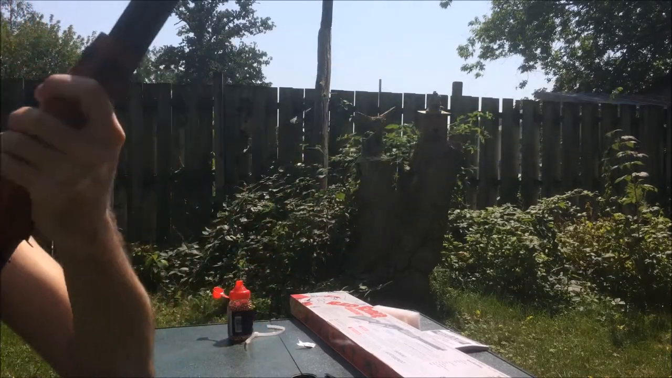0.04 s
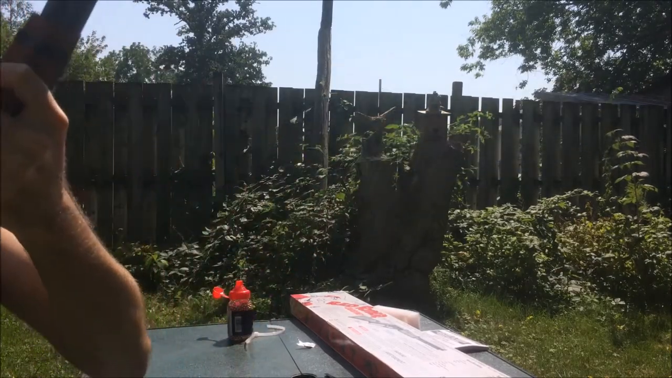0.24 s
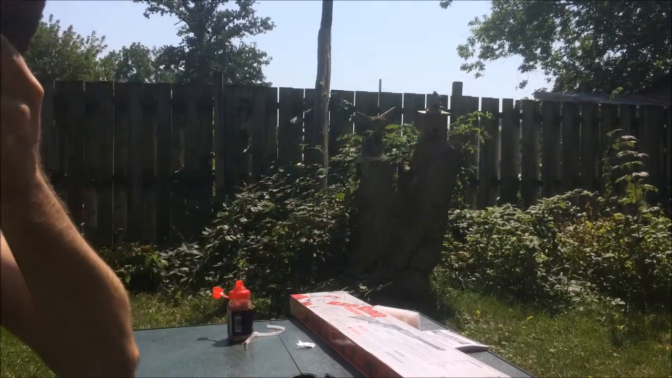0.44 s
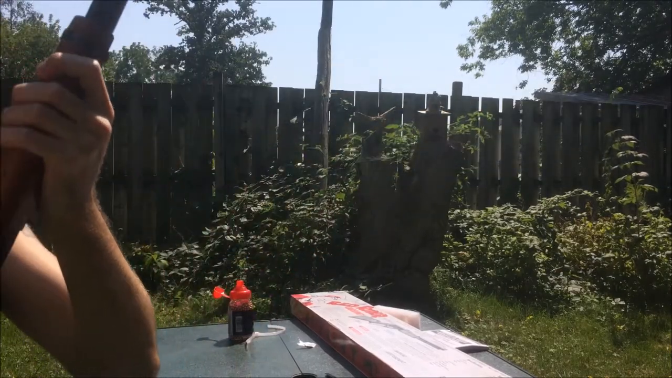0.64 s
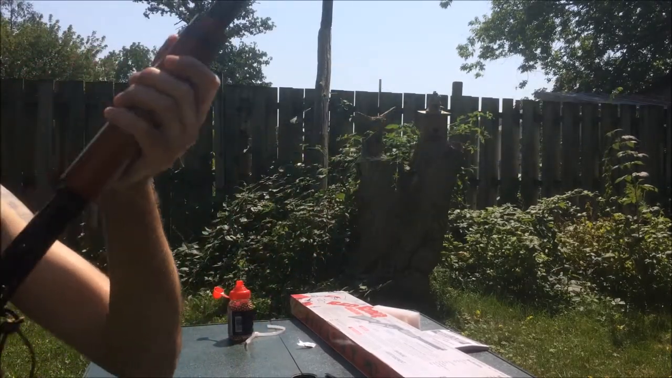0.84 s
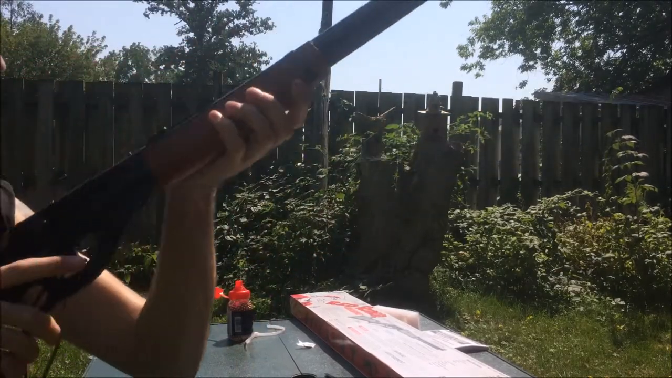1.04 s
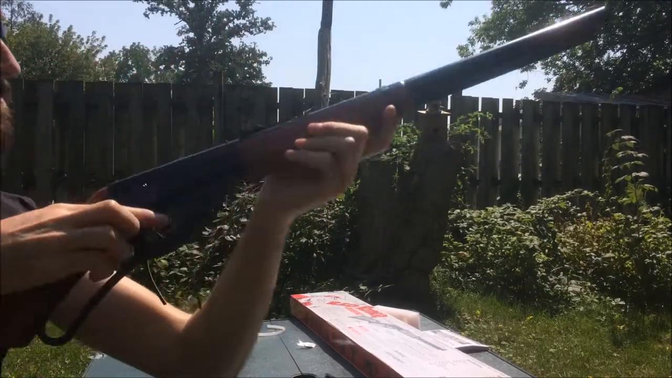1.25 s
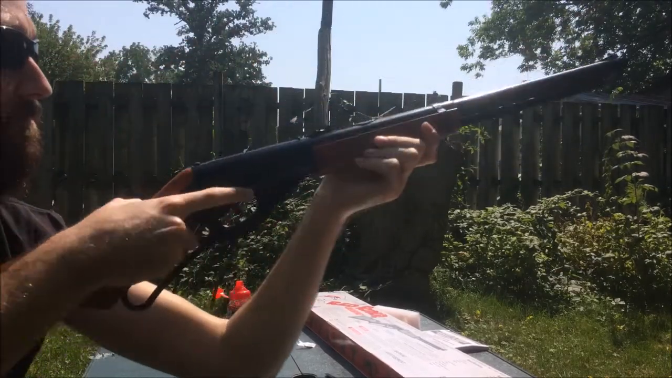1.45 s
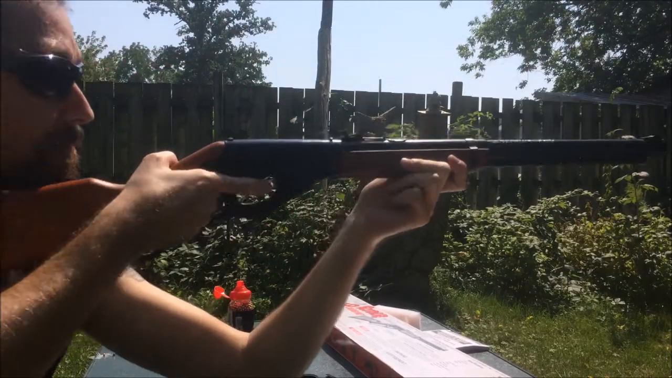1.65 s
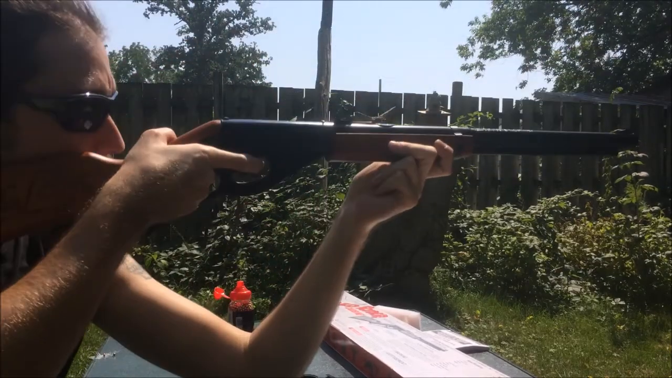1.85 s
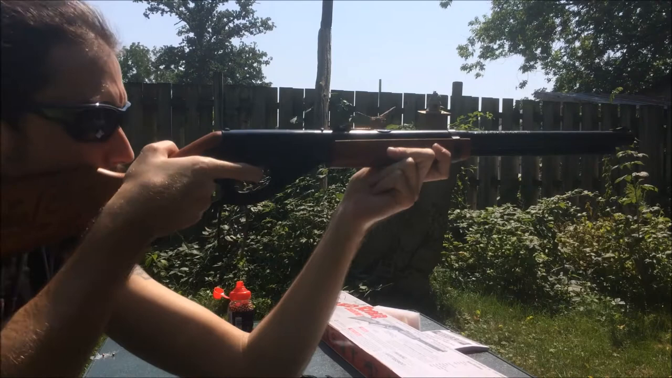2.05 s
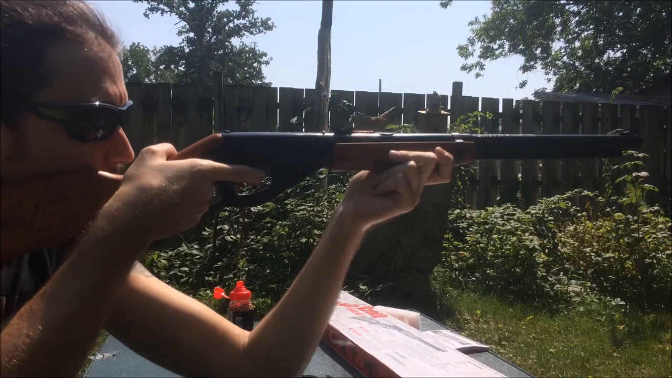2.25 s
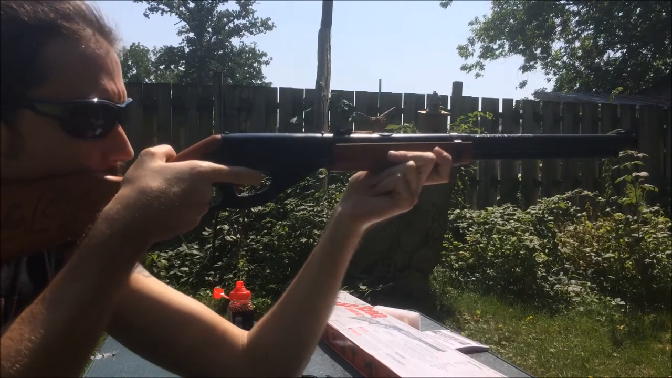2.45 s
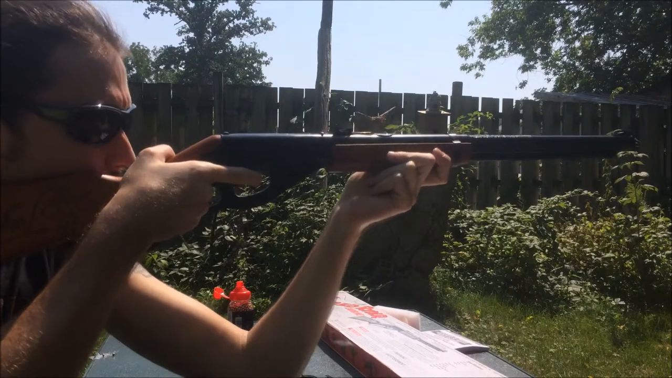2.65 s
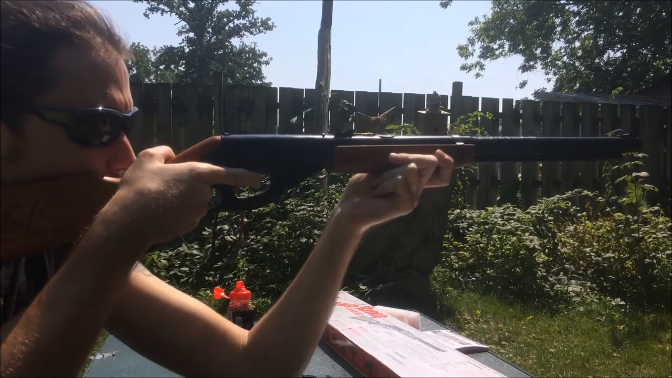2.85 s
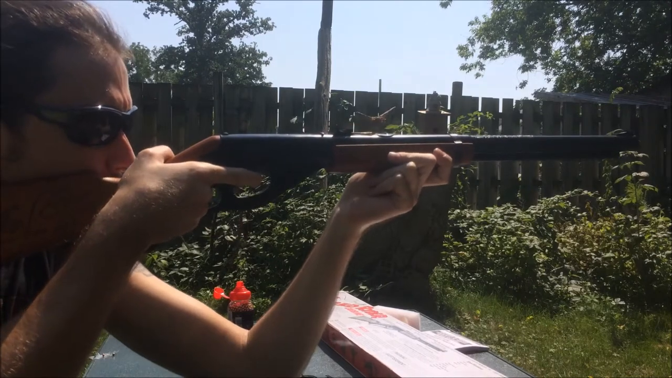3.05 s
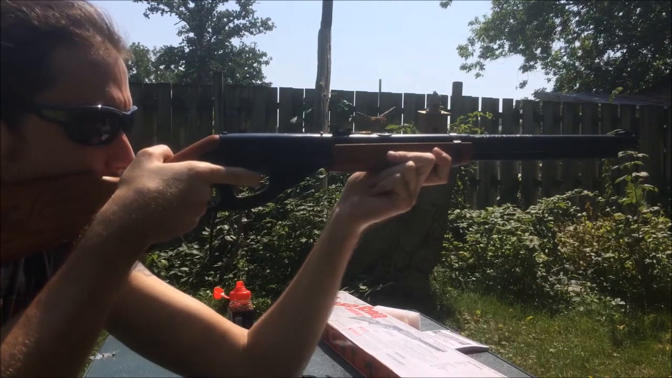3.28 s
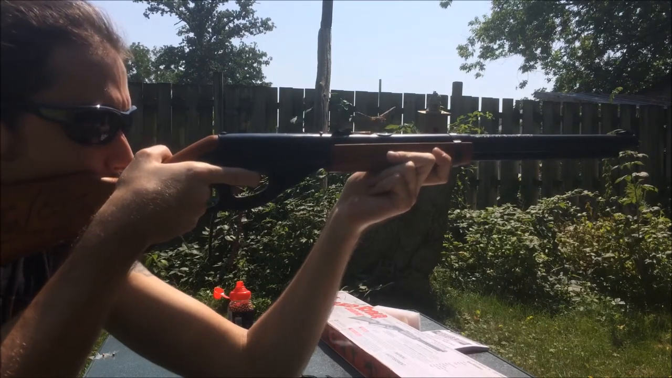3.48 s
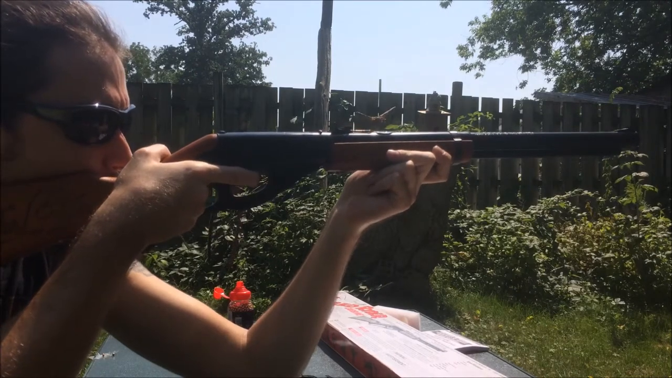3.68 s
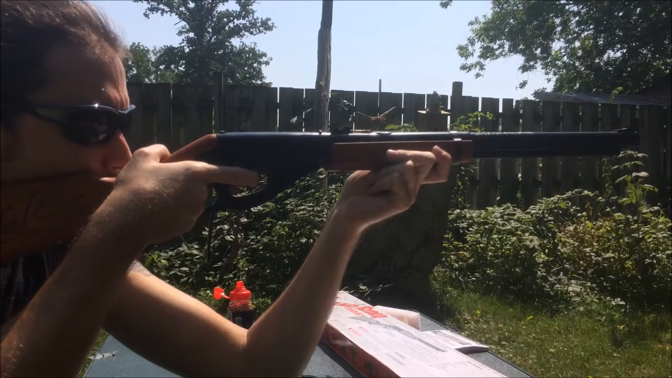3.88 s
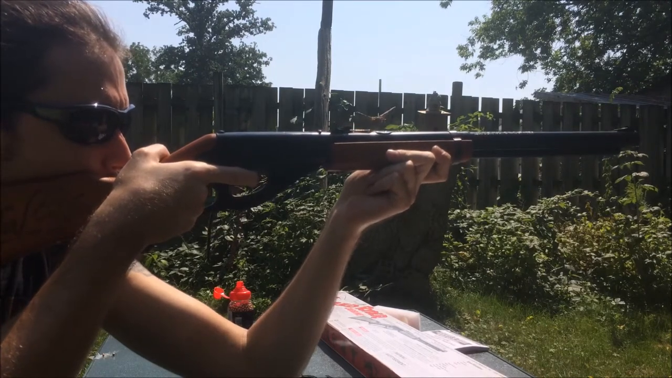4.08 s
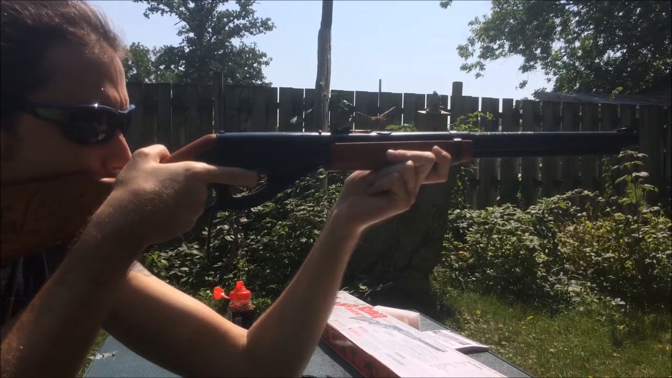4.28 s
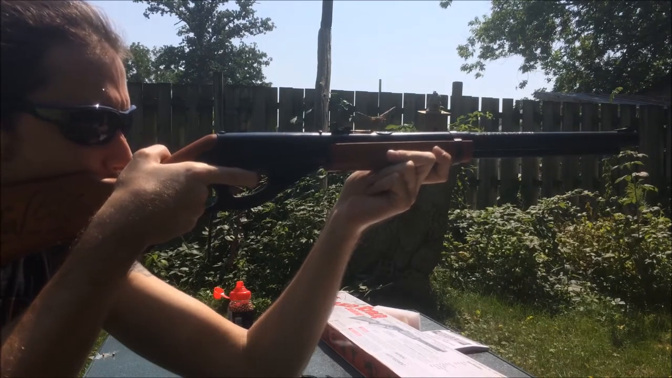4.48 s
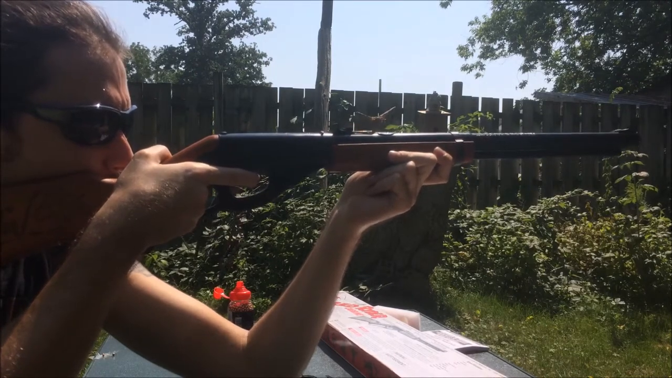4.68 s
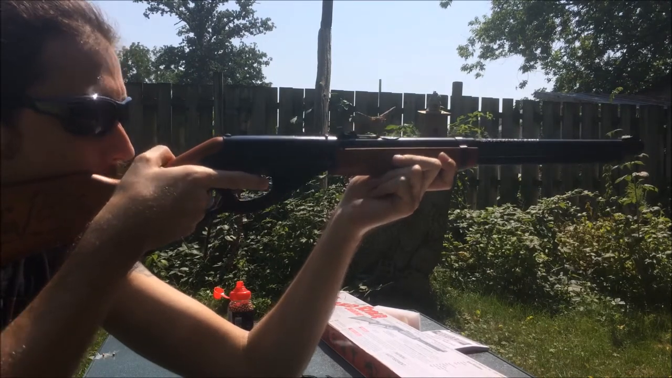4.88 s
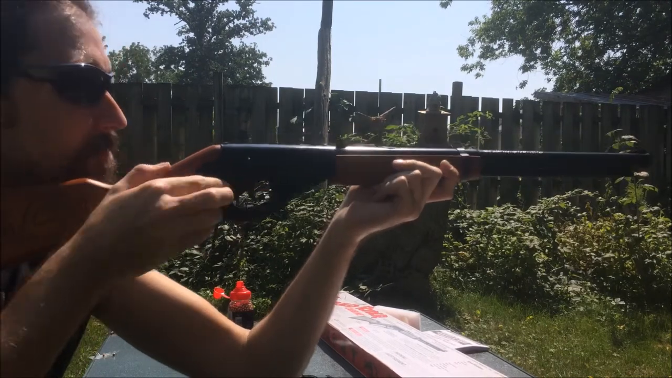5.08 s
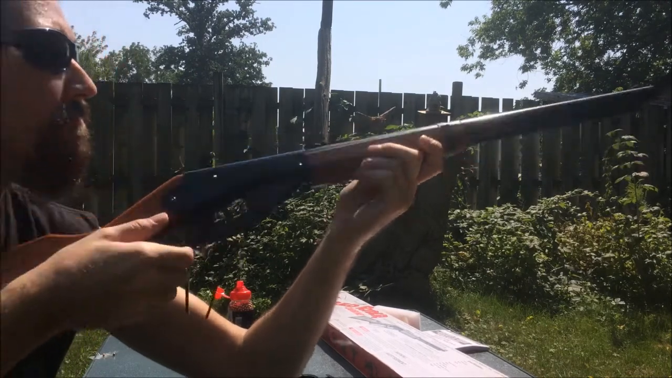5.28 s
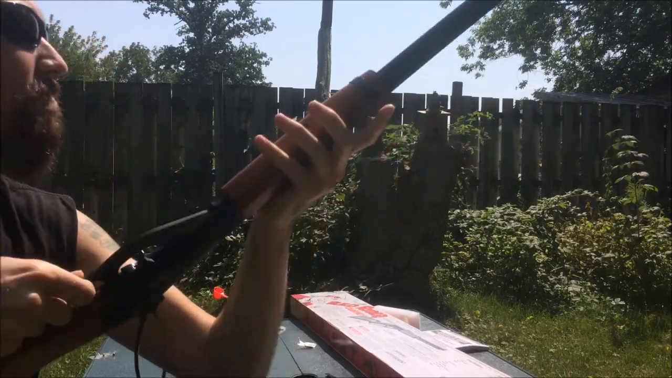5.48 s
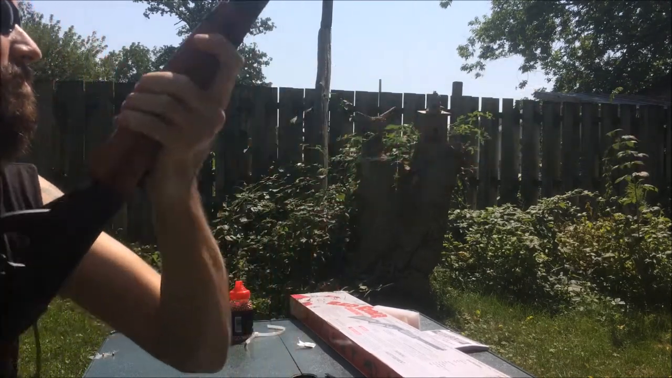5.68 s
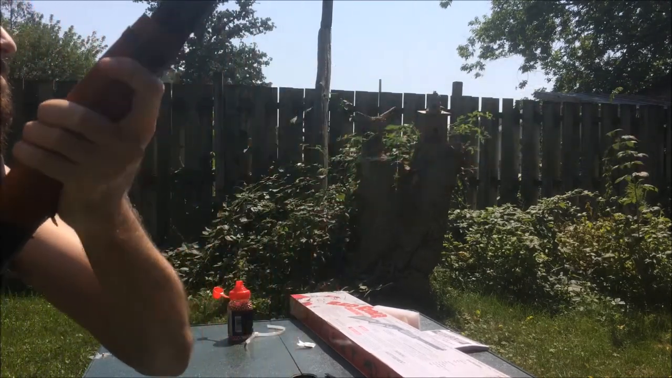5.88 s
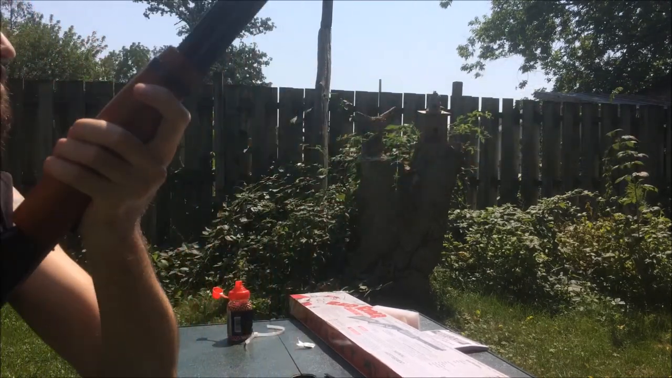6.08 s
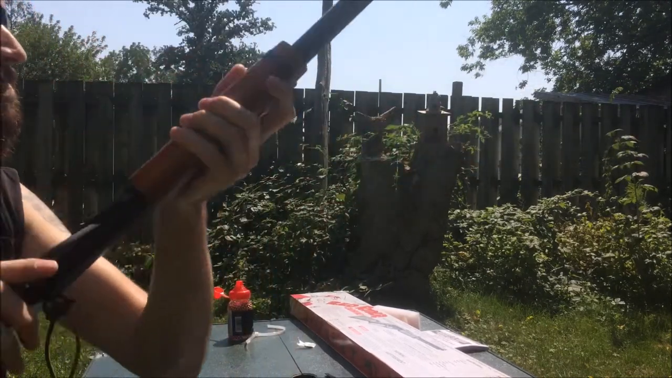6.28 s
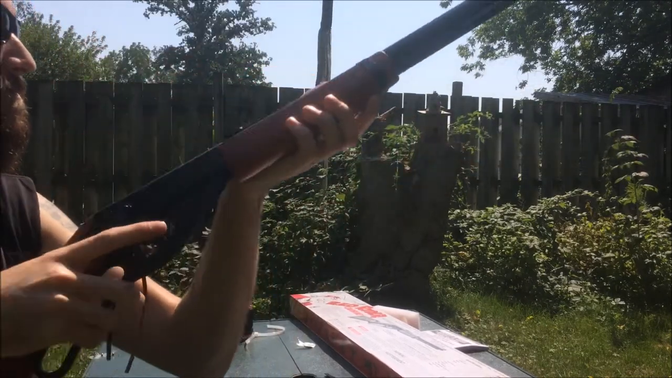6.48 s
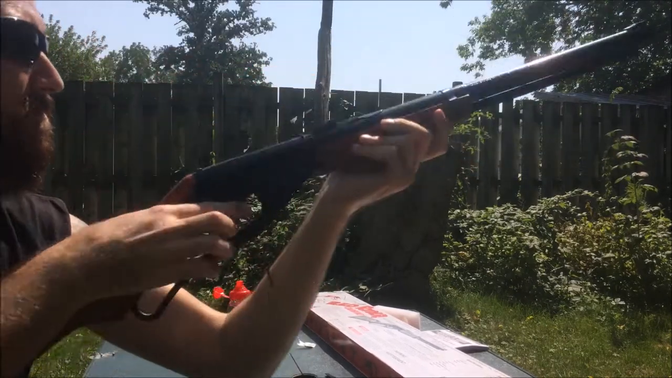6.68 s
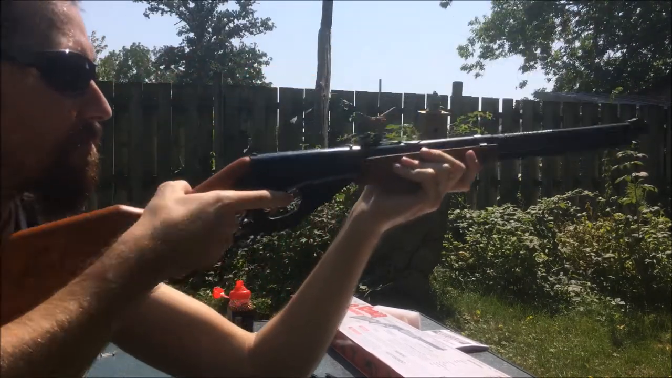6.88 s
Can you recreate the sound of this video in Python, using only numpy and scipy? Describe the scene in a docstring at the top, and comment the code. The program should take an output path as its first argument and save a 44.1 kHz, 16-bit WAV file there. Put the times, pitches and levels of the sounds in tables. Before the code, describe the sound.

Close up in a quiet backyard, loose steel shot rustles inside a spring air rifle. The lever creaks, ratchets through seven quick clicks and snaps shut. After a near-silent aiming pause, a sharp springy crack sounds, followed at once by a bright metallic target hit. Shot rushes noisily down the tube, and the lever ratchets and snaps again over faint wind and a distant motor drone.

```python
"""First loose steel shot slides along a magazine, then a spring air rifle is cocked in a quiet fenced yard.
Its pawl ratchets over seven teeth and its lever snaps shut: bursts of noise filtered by resonances.
The rifle is shouldered and fired: a piston slam, spring rebounds, puffs of air and a ringing metal target.
Then it is cocked again. Random collisions and short tones make the rolling shot; decaying modes ring.
Shaped noise gives wind, far traffic and insects; a wavering tone gives a distant motor."""
import sys
import numpy as np
from scipy import signal
from scipy.fft import rfft, irfft
from scipy.io import wavfile
from scipy.ndimage import uniform_filter1d

SR = 44100
rng = np.random.default_rng(int(sys.argv[2]) if len(sys.argv) > 2 else 0)


def store_pcm(level_fs):
    """Save levels as 16-bit WAV."""
    pcm = np.round(np.clip(level_fs, -1, 1) * 32767).astype(np.int16)
    wavfile.write(sys.argv[1], SR, np.atleast_2d(pcm).T)


N = 305605
TIME = np.arange(N) / SR
CUTOFF_HZ = 15900


def from_db(db):
    """Level law: decibels to amplitude gain."""
    return 10 ** (np.asarray(db) / 20)


def rms_one(x):
    """Power normalisation: scale to unit rms."""
    return x / np.sqrt(np.mean(x ** 2) + 1e-20)


def in_time(rows):
    """Linear interpolation: each column of a curve at every sample."""
    s, *columns = np.transpose(rows)
    return [np.interp(TIME, s, c) for c in columns]


def drift(rate):
    """Random modulation: chance values, rate per second, joined by lines and scaled to unit rms."""
    knots = rng.standard_normal(4096)
    return rms_one(np.interp(TIME * rate, np.arange(len(knots)), knots))


def colour(x, spectrum, peaks=(), size=8192):
    """Minimum-phase filtering: a broad spectrum with resonances; white noise keeps its power."""
    hz = np.maximum(np.arange(size // 2 + 1) * SR / size, 1)
    at, level = np.transpose(spectrum)
    db = np.interp(np.log(hz), np.log(at), level)
    # beyond the listed range the spectrum falls by 18 dB per octave
    octaves_below = np.maximum(np.log2(at[0] / hz), 0)
    octaves_above = np.maximum(np.log2(hz / at[-1]), 0)
    db = db - 18 * (octaves_below + octaves_above)
    for centre, width, lift in peaks:
        db = db + lift / (1 + (2 * (hz - centre) / width) ** 2)
    # keeping only the first half of the cepstrum makes the filter causal
    cepstrum = irfft(db * np.log(10) / 20)[:size // 2]
    response = irfft(np.exp(2 * rfft(cepstrum, size)))
    return signal.oaconvolve(x, response / np.linalg.norm(response))[:N]


def dying(t60):
    """Exponential decay: a gain that falls by 60 dB in t60 seconds."""
    t60 = max(t60, .001)
    return np.exp(-np.log(1000) * TIME[:int(2 * t60 * SR)] / t60)


def swell(start, attack, hold, db, fade_db_per_s):
    """Envelope: a gain that rises linearly, holds, then fades at a steady rate in dB."""
    since = TIME - start
    rise = np.clip(since / max(attack, 1 / SR), 0, 1)
    return rise * from_db(db - fade_db_per_s * np.maximum(since - attack - hold, 0))


def add(out, s, sound):
    """Superposition: mix a sound in at a time."""
    start = max(round(s * SR), 0)
    out[start:start + len(sound)] += sound[:N - start]


def contacts(rows):
    """Impact noise: each blow is a sudden burst of noise that dies away."""
    envelope = np.zeros(N)
    for s, db, t60 in rows:
        add(envelope, s, from_db(db) * dying(t60))
    return envelope * rng.standard_normal(N)


def struck(rows, modes):
    """Modal synthesis: each blow sets all modes of a part ringing, each at a random phase."""
    out = np.zeros(N)
    for s, db, *_ in rows:
        for hz, mode_db, t60 in modes:
            fall = dying(t60)
            turns = hz * TIME[:len(fall)] + rng.random()
            add(out, s, from_db(db + mode_db) * fall * np.sin(2 * np.pi * turns))
    return out


def scatter(x, t60, delay):
    """Diffuse scattering: convolve with a noise tail of unit energy that builds up over the delay."""
    fall = dying(t60)
    tail = fall * rng.standard_normal(N)[:len(fall)]
    tail *= 1 - np.exp(-(TIME[:len(fall)] / delay) ** 2)
    return signal.oaconvolve(x, tail / np.linalg.norm(tail))[:N]


# rumble of wind and of the moving arms on the microphone, before its lumps: (time [s], level [dB])
WIND = [(0.0, -38), (1.3, -64), (1.68, -42.5), (2.33, -53), (2.55, -44.5), (3.1, -45), (3.4, -52.5),
        (4.36, -57), (4.57, -44), (5.5, -51), (5.77, -39), (5.86, -53.5), (6.58, -42.5), (6.93, -48)]
# spectral shape: (frequency [Hz], level [dB])
WIND_COLOUR = [(20, -35), (48, -4), (100, -2), (135, -26), (200, -21), (480, -92)]


def wind(level_db=-1, lump_db=2.5):
    """Turbulence noise: low-frequency noise whose level wanders in lumps."""
    gust_db, = in_time(WIND)
    rumble = colour(rng.standard_normal(N), WIND_COLOUR)
    return from_db(gust_db + level_db + lump_db * drift(15)) * rumble


# spectral shape: (frequency [Hz], level [dB])
TRAFFIC_COLOUR = [(110, -31), (180, 1), (225, -4.5), (440, -8.5), (799, -3), (999, -4.5), (1810, -10),
                  (3500, -27), (4550, -81)]


def traffic(level_db=-50):
    """Incoherent sum of many far sources: steady noise with little treble."""
    return from_db(level_db) * colour(rng.standard_normal(N), TRAFFIC_COLOUR)


# mean pitch and level of a distant motor: (time [s], frequency [Hz], level [dB])
MOTOR = [(0, 145.4, -45), (1.7, 145.2, -42), (2.5, 145.5, -51), (4.5, 144.7, -47), (5.5, 142.7, -47),
         (6.1, 173.3, -45), (6.93, 174.9, -41)]
# spectral shape of the noise around its tone: (frequency [Hz], level [dB])
DRONE_COLOUR = [(95, -21.5), (120, 1), (150, 0), (215, -10), (290, -30)]


def motor(tone_db=-3, noise_db=-4, waver_db=1.0):
    """Frequency modulation: a distant drone, a wavering tone in a band of noise."""
    motor_hz, running_db = in_time(MOTOR)
    turns = np.cumsum(motor_hz * (1 + 0.01553 * drift(7.4))) / SR
    tone = from_db(tone_db) * np.sin(2 * np.pi * turns)
    noise = from_db(noise_db) * colour(rng.standard_normal(N), DRONE_COLOUR)
    return from_db(running_db + waver_db * drift(13)) * (tone + noise)


# spectral shape: (frequency [Hz], level [dB])
INSECT_COLOUR = [(2500, 3), (4500, 0.5), (6800, -10), (8300, 2.5), (9300, 5.5), (10000, -16), (16000, -16)]


def insects(level_db=-63):
    """Amplitude-modulated noise: a thin chorus, mostly treble."""
    return from_db(level_db + drift(24.5)) * colour(rng.standard_normal(N), INSECT_COLOUR)


# when the rifle is being moved: (start [s], end [s])
HANDLED = [(0, 1.51), (5.1, 7.6)]
TOUCHES_PER_S, TOUCH_DB, TOUCH_SPREAD_DB = 5, -40, 3


def touches():
    """Random point process: faint touches while the rifle is moved, as rows (time [s], level [dB])."""
    chance = rng.random((64, 2))
    times = np.cumsum(.5 + chance[:, 0]) / TOUCHES_PER_S
    levels = TOUCH_DB + TOUCH_SPREAD_DB * (2 * chance[:, 1] - 1)
    return [(s, db) for s, db in zip(times, levels)
            if any(start < s < min(end, TIME[-1]) for start, end in HANDLED)]


# dull knocks in the stock: (time [s], relative level [dB], contact t60 [s])
KNOCKS = [(0.2232, -25.5, 0.12), (1.7170, -32, 0.077), (1.7225, -19.5, 0.044), (1.7285, -22.5, 0.034),
          (1.7400, -34, 0.029), (1.7560, -41, 0.04), (5.7970, -26, 0.089), (6.2284, -34, 0.044)]
# spectral shape: (frequency [Hz], level [dB])
KNOCK_COLOUR = [(60, 3), (150, -8.5), (350, 0), (600, -9), (1050, -9.5), (1900, -5), (3500, -11.5),
                (9000, -20), (16000, -35)]
# modes of the stock: (frequency [Hz], relative level [dB], t60 [s])
STOCK_MODES = [(296, -15, .2), (410, -5, .11), (716, -4, .08), (955, -3, .07), (1044, -2, .15),
               (1600, -5, .07), (2050, -8, .06)]
# the clearest touches of lever, trigger and shot: (time [s], level [dB])
TICKS = [(0.0864, -34.5), (0.109, -39), (0.471, -14), (0.53, -18), (0.939, -25), (1.2514, -31),
         (4.594, -31), (5.561, -29), (5.567, -35), (5.632, -22), (6.029, -20.5), (6.138, -31.5),
         (6.18, -41), (6.311, -36), (6.441, -22.5), (6.6338, -16)]
# spectral shape of light metal contact: (frequency [Hz], level [dB])
TICK_COLOUR = [(300, -8), (1200, 2.5), (2400, 2), (4000, 4.5), (6500, 7), (10000, 6), (13000, 8.5),
               (16000, -1)]


def handling(knock_db=-3, wood_db=-7, tick_t60=.014):
    """Impact excitation: dull knocks set the stock ringing, and light touches tick on metal."""
    stock_peaks = [(hz, 200, 8 + db) for hz, db, _ in STOCK_MODES]
    knocks = colour(contacts(KNOCKS), KNOCK_COLOUR, stock_peaks)
    wood = struck(KNOCKS, STOCK_MODES)
    tick_rows = [(s, db, tick_t60) for s, db in TICKS + touches()]
    ticks = colour(contacts(tick_rows), TICK_COLOUR, TUBE_PEAKS)
    return from_db(knock_db) * knocks + from_db(wood_db) * wood + ticks


# the dry pivot creaks as the lever starts to move, before the grabs: (time [s], level [dB])
CREAK = [(0.212, -33), (0.228, -28.5), (0.245, -32.5), (0.272, -36), (0.288, -36), (0.3, -70)]
# resonances: (frequency [Hz], width [Hz], lift [dB])
CREAK_PEAKS = [(2320, 530, 19), (4800, 120, 15), (6450, 480, 12.4), (8200, 120, 17), (12300, 1300, 7.1)]


def creak(slips_per_s=900, grab_db=5):
    """Stick-slip friction: random slips of the pivot rasp into a few narrow resonances."""
    level_db, = in_time(CREAK)
    moving = (TIME > CREAK[0][0]) & (TIME < CREAK[-1][0])
    slips = (rng.random(N) < slips_per_s / SR).astype(float)
    rasp = rms_one(colour(slips, TICK_COLOUR, CREAK_PEAKS))
    # the pivot grabs and lets go
    return moving * from_db(level_db + grab_db * np.tanh(drift(148.8))) * rasp


# each tilt sends shot along the magazine: (start [s], attack [s], hold [s], level [dB], fade [dB/s])
SLIDES = [(0, 0.00073, 0.031, -40.5, 440), (0.162, 0.052, 0.25, -53.5, 295), (0.604, 0.023, 0.01, -41, 221),
          (1.234, 0.068, 0.058, -45, 121), (1.619, 0.22, 0.065, -34.5, 175), (5.31, 0.1, 0.21, -44.5, 205),
          (5.564, 0.0076, 0.11, -28.5, 125), (5.62, 0.1, 0.12, -27, 425), (6.296, 0.5, 0.23, -47, 98),
          (6.705, 0.25, .01, -42.5, 200)]
# the lever meets either stop: (time [s], level of its ring [dB])
LEVER_STOPS = [(0.478, -27.5), (1.08, -27), (6.039, -29.5), (6.587, -24.5)]
JOLT_DB, JOLT_ATTACK_S, JOLT_HOLD_S, JOLT_FADE_DB_PER_S = -39.5, 0.0052, 0.024, 244
TRICKLE_DB, TRICKLE_ATTACK_S = -60.5, 0.045
# once the rifle is shouldered the shot rocks to and fro, ever more weakly
ROCK_FROM_S, ROCK_UNTIL_S, ROCK_PERIOD_S = 2.05, 4.0, .1235
ROCK_DB, ROCK_SWING_DB, ROCK_FADE_DB_PER_S = -50.5, 2.5, 8.5


def shot_flow(rest_db=-76):
    """Power summation: slides, jolts from the lever, a trickle and rocking give the flow in dB."""
    slides = [swell(*row) for row in SLIDES]
    jolts = [swell(s, JOLT_ATTACK_S, JOLT_HOLD_S, JOLT_DB, JOLT_FADE_DB_PER_S) for s, _ in LEVER_STOPS]
    # a little shot trickles while the rifle is being moved
    trickles = [swell(start, TRICKLE_ATTACK_S, end - start - TRICKLE_ATTACK_S, TRICKLE_DB, JOLT_FADE_DB_PER_S)
                for start, end in HANDLED]
    since = TIME - ROCK_FROM_S
    swing_db = ROCK_SWING_DB * np.cos(2 * np.pi * since / ROCK_PERIOD_S)
    rocking = from_db(ROCK_DB - ROCK_FADE_DB_PER_S * since + swing_db)
    rocking = rocking * (since > -ROCK_PERIOD_S / 2) * (TIME < ROCK_UNTIL_S)
    parts = slides + jolts + trickles + [rocking, from_db(rest_db)]
    return 10 * np.log10(sum(part ** 2 for part in parts))


def thin_band(waver_db=3.0):
    """Narrow-band noise: a thin, wavering band near 4 kHz is held while the shot rocks, then stops."""
    band_filter = signal.butter(2, (3780, 4220), "band", fs=SR, output="sos")
    band = signal.sosfilt(band_filter, rng.standard_normal(N))
    held = swell(start=1.9, attack=.2, hold=1.9, db=-69, fade_db_per_s=150)
    return held * from_db(waver_db * drift(27)) * rms_one(band)


SPRINKLE_FROM_S, SPRINKLE_UNTIL_S = 5.57, 5.85
SPRINKLES_PER_S, SPRINKLE_S = 110, .008  # rate and mean length
SPRINKLE_LOW_HZ, SPRINKLE_HIGH_HZ = 3000, 12000
SPRINKLE_DB, SPRINKLE_RISE_DB = -35, 11  # level of the lowest tone, and rise to the highest


def sprinkled_tones():
    """Random grains through the loud slide of shot: (time [s], length [s], frequency [Hz], level [dB])."""
    span = SPRINKLE_UNTIL_S - SPRINKLE_FROM_S
    rows = []
    for when, long, pitch in rng.random((int(SPRINKLES_PER_S * span), 3)):
        hz = SPRINKLE_LOW_HZ * (SPRINKLE_HIGH_HZ / SPRINKLE_LOW_HZ) ** pitch
        db = SPRINKLE_DB + SPRINKLE_RISE_DB * pitch
        rows.append((SPRINKLE_FROM_S + when * span, SPRINKLE_S * (.5 + long), hz, db))
    return rows


# brief faint tones within the rush of shot:
# (time [s], length [s], mean frequency [Hz], peak level [dB])
BRIEF_TONES = [(5.588, .055, 2800, -35), (5.725, .035, 4300, -28)]


def tones_in_the_rush(waver=.015):
    """Frequency modulation: short tones at an unsteady pitch under a smooth arch."""
    out = np.zeros(N)
    for s, length, hz, db in BRIEF_TONES + sprinkled_tones():
        turns = np.cumsum(hz * (1 + waver * drift(400))) / SR
        arch = np.hanning(int(length * SR))
        add(out, s, from_db(db) * arch * np.sin(2 * np.pi * turns[:len(arch)]))
    return out


FINE_FROM_HZ, FINE_WIDTH_HZ, FINE_SPREAD_DB = 1800, 90, 10


def fine_modes(width_hz=FINE_WIDTH_HZ, count=80):
    """Modal density: close shell resonances and gaps, as rows (frequency [Hz], width [Hz], lift [dB])."""
    places = (np.arange(count) + rng.random(count)) / count
    centres = FINE_FROM_HZ + (CUTOFF_HZ - FINE_FROM_HZ) * places
    return [(hz, width_hz, FINE_SPREAD_DB * rng.uniform(-1.36, 1)) for hz in centres]


# spectral shape: (frequency [Hz], level [dB])
ROLL_COLOUR = [(500, -17), (1500, -12.5), (3000, -7), (4300, 2), (6500, 0.5), (8500, 1.5), (10600, 1),
               (13300, -6.5), (14400, -3), (16000, -15.5)]


def shifting(x, count=4, places_per_s=25):
    """Position-dependent excitation: the sound passes between colourings as the balls strike new places."""
    shares = np.array([np.exp(2 * drift(places_per_s)) for _ in range(count)])
    shares = shares / shares.sum(axis=0)
    return sum(share * colour(x, ROLL_COLOUR, fine_modes()) for share in shares)


# how far the barrel is raised: (time [s], angle [degrees])
TILT = [(0, 84), (.75, 36), (1.25, 26), (5.1, 3), (5.5, 29), (5.75, 54), (6.4, 16)]


def tilted(x, bright_hz=12800, level_bright_db=-1.5, bright_db_per_degree=0.2585):
    """Impact brightness: the higher the barrel points, the stronger the treble of the falling shot."""
    degrees, = in_time(TILT)
    low = signal.sosfilt(signal.butter(3, bright_hz, "low", fs=SR, output="sos"), x)
    high = signal.sosfilt(signal.butter(3, bright_hz, "high", fs=SR, output="sos"), x)
    return low + from_db(level_bright_db + bright_db_per_degree * degrees) * high


# resonances of the magazine tube: (frequency [Hz], width [Hz], lift [dB])
TUBE_PEAKS = [(2620, 140, 5.2), (6360, 620, 6.5), (6870, 110, 4.9), (8440, 270, 4.9), (9300, 200, 2.4),
              (11160, 300, 3), (12360, 450, 7.8), (14400, 180, 3.2)]
BALL_SPREAD_DB, CLUMP_DB, WANDER_DB = 4.2, 3, 5  # size of collisions, clumping, swing of resonances


def rolling_shot(per_s=6000, chatter_db=-3, chatter_t60=.008):
    """Granular excitation: steel balls collide in the tube at random, more often in a faster slide."""
    flow_db = shot_flow()
    rate = per_s * from_db(0.41 * (flow_db - flow_db.max()))
    sizes = from_db(BALL_SPREAD_DB * np.minimum(rng.exponential(1, N), 4))
    sizes = sizes * rng.choice([-1, 1], N)
    hits = rng.random(N) < rate / SR
    clumps = from_db(CLUMP_DB * np.tanh(drift(200)))
    # dividing by the root of the rate leaves the level to the flow
    collisions = rms_one(hits * sizes / np.sqrt(rate) * clumps)
    # every collision sets its neighbours chattering for a moment
    stirred = np.sqrt(np.abs(signal.oaconvolve(collisions ** 2, dying(chatter_t60))[:N]))
    chatter = from_db(chatter_db) * rms_one(stirred * rng.standard_normal(N))
    balls = shifting(collisions + chatter)
    # the tube's resonances swell and fade as the balls travel along it
    out = balls.copy()
    for hz, width, lift in TUBE_PEAKS:
        ringing = signal.lfilter(*signal.iirpeak(hz, hz / width, fs=SR), balls)
        out += (from_db(lift) - 1) * from_db(WANDER_DB * np.tanh(drift(24))) * ringing
    return from_db(flow_db) * tilted(rms_one(out))


# the pawl drops over seven teeth each time the lever opens:
# (time [s], relative level [dB], contact t60 [s], lift of its bright ring [dB])
RATCHET = [(0.312, -14, 0.046, 8), (0.337, -13.5, 0.052, 8), (0.366, -13.5, 0.037, 13),
           (0.399, -14.5, 0.048, 7), (0.4294, -15.5, 0.04, 2), (0.456, -20, 0.061, 5),
           (0.478, -12.5, 0.026, 6), (5.870, -16.5, 0.042, 9), (5.9049, -10.5, 0.024, 17),
           (5.926, -12.5, 0.04, 5), (5.9502, -15.5, 0.073, 12), (5.981, -19.5, 0.062, 2),
           (6.0109, -22.5, 0.17, -7), (6.041, -17.5, 0.052, 6.5)]
# spectral shape: (frequency [Hz], level [dB])
RATCHET_COLOUR = [(300, -25), (750, -12.5), (1500, -0.5), (3500, 4), (6500, -1), (10500, -5.5), (13000, -3),
                  (16000, -12)]
# resonances, before the chance shift of each tooth: (frequency [Hz], width [Hz], lift [dB])
RATCHET_PEAKS = [(2880, 160, -11), (8280, 1200, 6.5)]
TAP_DB, TAP_T60_S = 5, .005  # the sharp first tap stands above the chatter
BOUNCE_S, BOUNCE_DB, BOUNCE_T60_S = .0044, -3.5, .014  # mean delay, level against the drop, decay
TOOTH_WIDTH_HZ, TEETH_MODES = 260, 28


def ratchet(level_db=-3, body_db=7, body_loss=0.17, ring_hz=5750, body_hz=2080):
    """Repeated impact: tap, chatter and bounce; clean drops ring bright, dragging ones stir the receiver."""
    out = np.zeros(N)
    for s, db, t60, ring_db in RATCHET:
        ring_peak = (ring_hz, 600, ring_db)
        body_peak = (body_hz, 380, body_db - body_loss * ring_db)
        peaks = [(hz * rng.normal(1, .025), width, lift)
                 for hz, width, lift in RATCHET_PEAKS + [ring_peak, body_peak]]
        peaks += fine_modes(TOOTH_WIDTH_HZ, count=TEETH_MODES)
        tap = (s, db + TAP_DB, TAP_T60_S)
        bounce = (s + BOUNCE_S * rng.uniform(.7, 1.3), db + BOUNCE_DB, BOUNCE_T60_S)
        out += colour(contacts([tap, (s, db, t60), bounce]), RATCHET_COLOUR, peaks, size=2048)
    return from_db(level_db) * out


# lever snapping shut: (time [s], relative level [dB], ring frequency [Hz],
# lift of that ring [dB], level of the thud in the stock [dB])
SNAPS = [(1.081, -2, 7760, 3.5, -28), (6.5821, -2.5, 8870, 14, -19.5)]
# spectral shapes of slap and thud: (frequency [Hz], level [dB])
SNAP_COLOUR = [(120, -13), (200, -19.5), (3250, -26), (3760, -6.5), (5130, -13), (8740, -6), (9750, -15),
               (12400, -11), (16000, -6.5)]
THUD_COLOUR = [(55, 11.5), (220, -3), (400, -13.5), (700, -4.5), (1400, -21), (3000, -35.5)]
# resonances of the slap: (frequency [Hz], width [Hz], lift [dB])
SNAP_PEAKS = [(754, 98, 12), (2080, 410, 14.7), (2700, 1340, 11.2), (3620, 120, 7.6), (12740, 200, 8.8)]
# modes of the lever: (frequency [Hz], relative level [dB], t60 [s])
LEVER_MODES = [(1366, 0, .17), (1325, -4, .1), (1265, -5, .09), (2380, -10, .12), (3720, -2, .08)]


def lever(level_db=3, contact_t60=0.014, thud_t60=0.035, rattle_db=-26, rattle_t60=0.43):
    """Impact and free vibration: the lever slaps the receiver, thuds, shakes the loose shot and rings."""
    slap = np.zeros(N)
    for s, db, hz, ring_db, _ in SNAPS:
        blow = contacts([(s, db + level_db, contact_t60)])
        slap += colour(blow, SNAP_COLOUR, SNAP_PEAKS + [(hz, 600, ring_db)])
    thud = colour(contacts([(s, thud_db, thud_t60) for s, *_, thud_db in SNAPS]), THUD_COLOUR)
    shaken = contacts([(s, db + rattle_db, rattle_t60) for s, db, *_ in SNAPS])
    rattle = colour(shaken * from_db(3 * drift(500)), TICK_COLOUR)
    return slap + thud + rattle + struck(LEVER_STOPS, LEVER_MODES)


# pellet on the target and its rebound inside: (time [s], relative level [dB], contact t60 [s])
TARGET_HITS = [(4.7728, -4.5, 0.13), (4.7855, -13, 0.43)]
# spectral shape: (frequency [Hz], level [dB])
TARGET_COLOUR = [(300, -3), (1500, 9), (3000, 9.5), (5000, 11.5), (10000, 14), (16000, 6)]
# modes of the target: (frequency [Hz], relative level [dB], t60 [s])
TARGET_MODES = [(2202, -26.5, 1.05), (2606, -24, .4), (2821, -24, .33), (3542, -23, .45), (3665, -19, .36),
                (3779, -21, .33), (3984, -8, .26), (4613, -19, .26), (4996, -12, .15), (5075, -16, .4),
                (5356, -15, .36), (5706, -20, .36), (6336, -21, .32), (6681, -21, .38), (6855, -19, .33),
                (7510, -9, .14), (8053, -15, .23), (8506, -16, .36), (8685, -13, .3), (9246, -11, .22),
                (9781, -6, .22), (10400, -11, .15), (12222, -14, .24), (12490, -15, .24), (13300, -16, .24),
                (14220, -14, .15)]


def target(crash_db=-7.5, ring_db=3.5, first_db=-8, shimmer_db=-15, shimmer_t60=.3):
    """Modal vibration: the pellet crashes into hollow metal, which shimmers densely, then rings clearly."""
    blows = contacts(TARGET_HITS)
    shimmer = from_db(shimmer_db) * scatter(blows, t60=shimmer_t60, delay=0.0063)
    peaks = [(hz, 80, 21 + .55 * db) for hz, db, _ in TARGET_MODES]
    crash = colour(blows + shimmer, TARGET_COLOUR, peaks)
    # the first hit rings a dense crowd of weak modes around the listed ones, the rebound the listed ones
    neighbours = [(hz * rng.uniform(.88, 1.12), min(db, -17), .6 * t60)
                  for hz, db, t60 in TARGET_MODES[2:] * 3]
    first_ring = from_db(first_db) * struck(TARGET_HITS[:1], neighbours)
    rebound_ring = struck(TARGET_HITS[1:], TARGET_MODES)
    return from_db(crash_db) * crash + from_db(ring_db) * (first_ring + rebound_ring)


# piston slam and spring rebounds: (time [s], relative level [dB], contact t60 [s])
SHOT = [(4.6089, -7.5, 0.01), (4.6115, -3.5, 0.0088), (4.6196, -13.5, 0.027), (4.6380, -9, 0.022),
        (4.6460, -9, 0.018), (4.6537, -9.5, 0.029), (4.6610, -20, 0.058)]
# spectral shape: (frequency [Hz], level [dB])
SHOT_COLOUR = [(88, 9), (150, -21), (354, 1), (821, -7), (1170, 1.5), (2600, -3), (3220, -6.5), (3550, 6.5),
               (5150, 0), (6910, 6), (16000, -8.5)]
# resonances: (frequency [Hz], width [Hz], lift [dB])
SHOT_PEAKS = [(2500, 800, 8.6), (3730, 1200, 3.3), (5800, 610, 5.8), (6750, 120, 8.9)]
# puffs of air from the muzzle: (time [s], relative level [dB], t60 [s])
PUFFS = [(4.6110, -20.5, 0.028), (4.6165, -9, 0.03), (4.6250, -12.5, 0.045)]
# spectral shape: (frequency [Hz], level [dB])
PUFF_COLOUR = [(80, 4), (200, -0.5), (380, -1.5), (600, -10), (1150, -7), (2600, -3.5), (6000, -33)]
# modes of the barrel shroud: (frequency [Hz], relative level [dB], t60 [s])
BARREL_MODES = [(265, -2, .1), (375, 2, .2), (511, 0, .17), (630, -1, .22), (760, -8, .22), (1150, -1, .2),
                (1357, -5, .2), (12900, -4, .35)]


def shot(level_db=1.5, spring_db=-2.5, spring_t60=0.22, puff_db=-2, barrel_db=-32):
    """Impact, jet noise and resonance: piston slam, muzzle air, buzzing spring and ringing shroud."""
    blows = from_db(level_db) * contacts(SHOT)
    slam = colour(blows, SHOT_COLOUR, SHOT_PEAKS)
    buzz = from_db(spring_db) * scatter(blows, t60=spring_t60, delay=0.00047)
    # the spring's buzz is brighter than the blows themselves
    buzz = colour(buzz, TICK_COLOUR, SHOT_PEAKS)
    puff = from_db(puff_db) * colour(contacts(PUFFS), PUFF_COLOUR)
    barrel = from_db(barrel_db) * struck(SHOT, BARREL_MODES)
    return slam + buzz + puff + barrel


def scene(yard_db=-20, yard_t60=0.11):
    """Early scattering: the rifle is close; fence and bushes return a faint tail."""
    background = wind() + traffic() + motor() + insects()
    near = handling() + creak() + tones_in_the_rush() + ratchet() + lever() + target() + shot()
    yard = from_db(yard_db) * scatter(near, t60=yard_t60, delay=0.017)
    return (background + thin_band() + rolling_shot() + near + yard)[None]


GAIN_THRESHOLD_DB, GAIN_SLOPE, GAIN_RECOVERY_DB_PER_S, GAIN_ATTACK_S = -16, 0.73, 10, 0.026


def gain_control(x):
    """Dynamic compression: level above the threshold pulls the gain down; it recovers at a steady rate."""
    level_db = 10 * np.log10(np.abs(uniform_filter1d(x[0] ** 2, size=512)) + 1e-12)
    recovery = GAIN_RECOVERY_DB_PER_S * TIME
    wanted_cut_db = GAIN_SLOPE * np.maximum(level_db - GAIN_THRESHOLD_DB, 0)
    # a running maximum on a rising ramp holds each cut, then lets it shrink along the ramp
    cut_db = np.maximum.accumulate(wanted_cut_db + recovery) - recovery
    keep = np.exp(-1 / (GAIN_ATTACK_S * SR))
    return x * from_db(-signal.lfilter([1 - keep], [1, -keep], cut_db))


def record(dry):
    """Compression, saturation and band limiting: gain ducks, peaks are rounded and the top is cut."""
    rounded = 1.2 * np.tanh(gain_control(dry) / 1.2)
    low_pass = signal.ellip(10, .2, 90, CUTOFF_HZ, fs=SR, output="sos")
    return signal.sosfilt(low_pass, rounded)


dry = scene()
out = record(dry)
store_pcm(out)
```